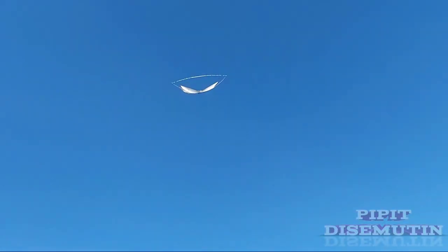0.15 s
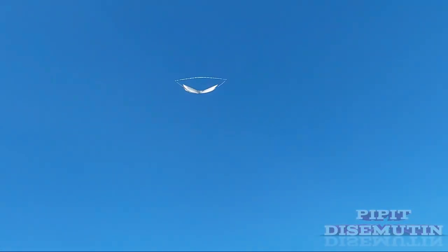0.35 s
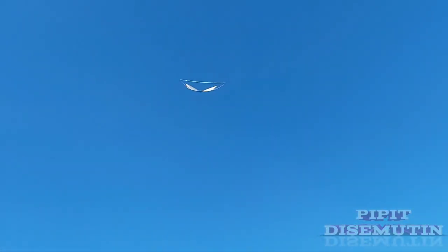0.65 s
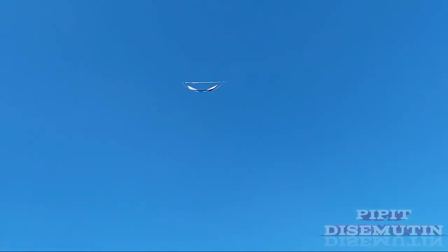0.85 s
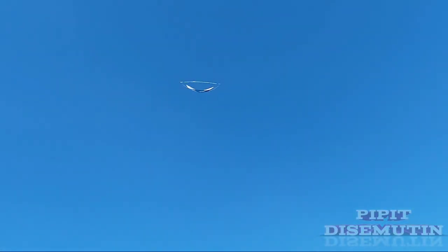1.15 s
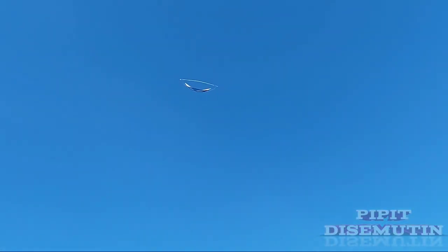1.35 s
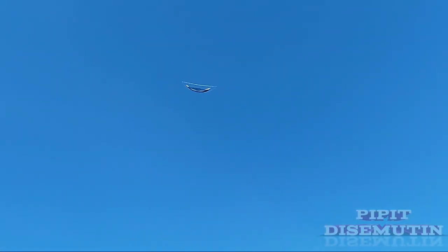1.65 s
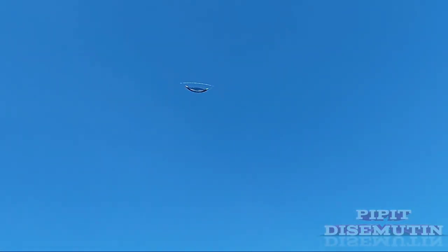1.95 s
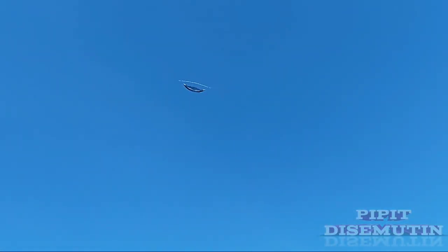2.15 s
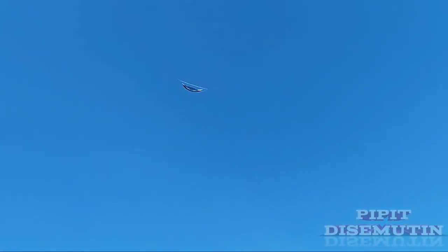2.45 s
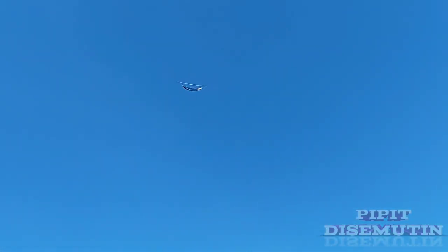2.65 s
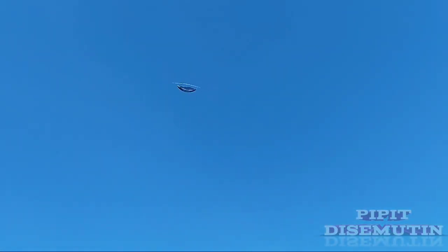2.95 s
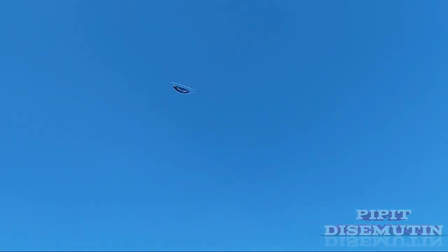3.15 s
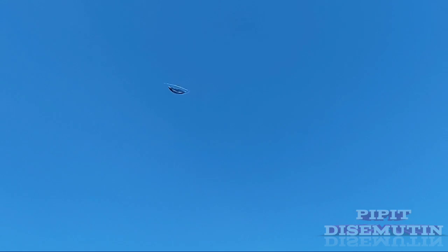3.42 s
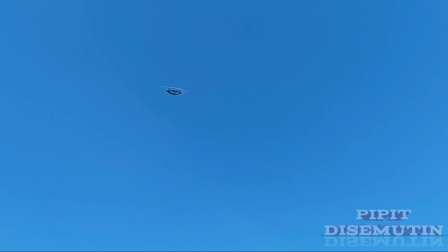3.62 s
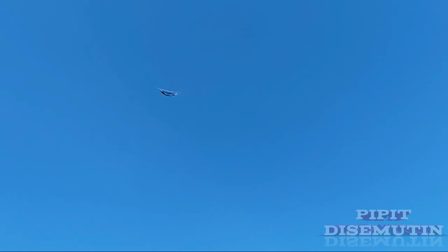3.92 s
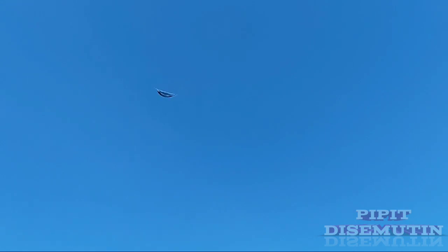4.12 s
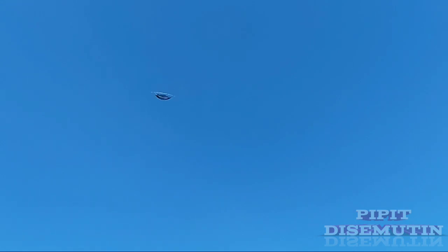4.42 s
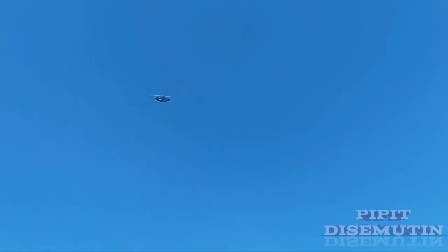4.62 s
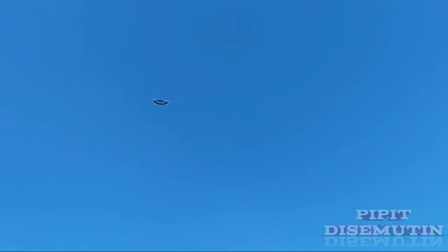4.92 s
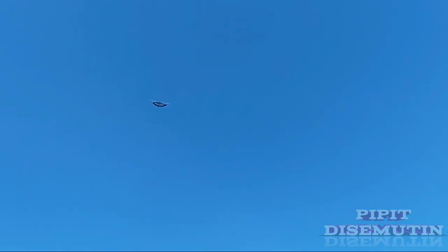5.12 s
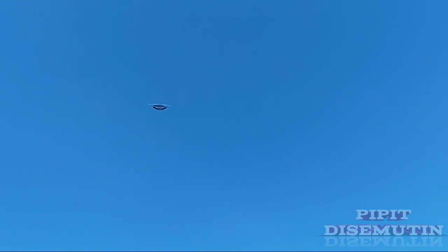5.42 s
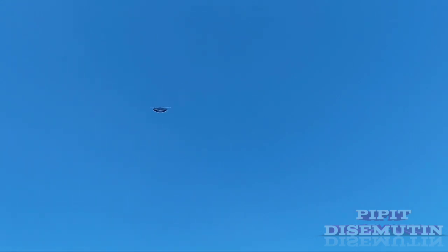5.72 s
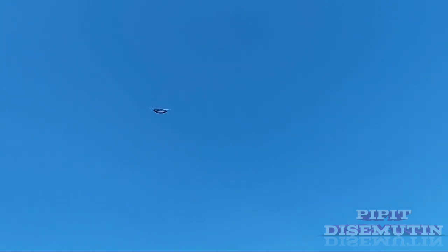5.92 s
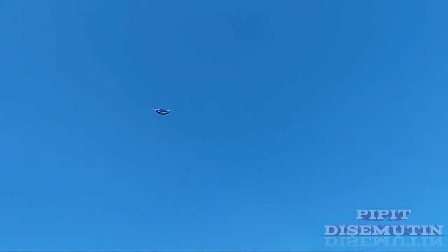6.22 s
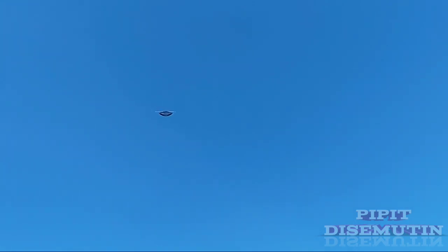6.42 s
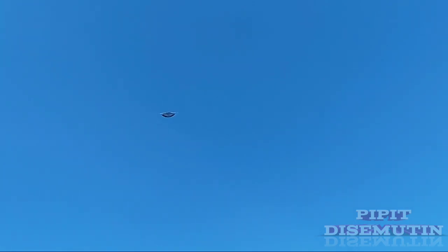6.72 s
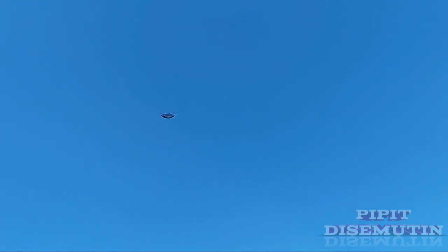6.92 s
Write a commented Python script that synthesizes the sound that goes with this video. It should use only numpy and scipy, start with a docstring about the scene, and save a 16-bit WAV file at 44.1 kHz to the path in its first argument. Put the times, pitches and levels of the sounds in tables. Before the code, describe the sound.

High overhead outdoors, a kite's stretched ribbon hums without pause, a fast fluttering whop-whop buzz of mid-pitched strokes with raspy, fizzing edges. Low wind rumble and dull thuds hit the microphone throughout, with a harsher gust on the right a little past the middle. A faint breeze rustles grass, tiny dry crackles appear, and a small bird ticks thinly towards the end.

```python
"""A taut ribbon on a kite drones high overhead: it twists to and fro about 15 times a second, and each
stroke is a short whoop of swept overtones and torn air that the ground repeats about 10 ms later.
Wind noise rumbles, roars and thuds at the two microphone ports; a breeze hisses and rustles in grass.
Shaped noise makes dry crackles, a papery scuff and, near three seconds, a faint raspy peep and a chirp.
A small bird, made of short rising whistles, ticks thinly towards the end."""
import sys
import numpy as np
from scipy import signal
from scipy.fft import rfft, irfft, next_fast_len
from scipy.io import wavfile
from scipy.ndimage import uniform_filter1d, map_coordinates

SR = 44100
rng = np.random.default_rng(int(sys.argv[2]) if len(sys.argv) > 2 else 0)


def inscribe(sig):
    """Save sig as 16-bit PCM at rate SR to the path in sys.argv[1].

    A 1-D sig is mono; a 2-D sig holds one channel per row.
    Samples are clipped to [-1, 1] before scaling.
    """
    pcm = np.round(np.clip(np.atleast_2d(sig).T, -1, 1) * 32767)
    wavfile.write(sys.argv[1], SR, pcm.astype(np.int16))


N = 311520

# how fast the ribbon twists to and fro: t/s, f/Hz (full swings)
SWING = [(0, 14.38), (.33, 14.5), (.62, 14.42), (1.45, 14.47), (1.65, 14.54), (2.3, 14.56), (2.5, 14.85),
         (2.65, 14.97), (2.95, 14.83), (3.25, 15.02), (3.55, 14.78), (4, 14.86), (5.2, 14.9), (5.9, 15.02),
         (6.35, 14.99), (6.52, 15.13), (6.8, 15), (7.06, 15.03)]
# air at the kite: t/s, turbulence (0-1), lean (0 = the backward stroke drags, 1 = the forward one)
AIR = [(0, .04, 0), (.6, .08, 0), (2.3, .04, 0), (2.7, .12, 0), (4, .2, 0), (4.3, .4, 0), (4.7, .4, .05),
       (5.2, .35, .4), (5.5, .12, .5), (5.9, .12, .75), (6.2, .06, 1), (7.06, .05, 1)]
# the whoop as the wind rises and falls: t/s, mean f/Hz before the stroke ratios, relative level/dB
RIBBON = [(0, 531.5, -11.5), (0.42, 572, -14.5), (0.85, 555, -13), (1.05, 575, -15.5), (1.5, 560.3, -12.5),
          (2.3, 536, -11), (2.5, 522, -15.5), (3.0, 514, -16), (3.6, 527.4, -15.5), (3.92, 525, -12),
          (4.17, 534, -15.5), (4.27, 502, -18), (4.45, 539, -17), (4.65, 517, -18.5), (4.75, 502, -15),
          (4.94, 594, -17), (5.12, 558, -16), (5.28, 568, -15.5), (5.4, 619, -14.5), (5.7, 584.6, -15.5),
          (6.15, 554.3, -14), (7.06, 535, -12)]
# how the strokes differ as the kite banks: t/s, backward pitch (ratio), backward extra level/dB,
# forward length (ratio)
BANK = [(0, 0.96, 2, 1.094), (1, 0.97, 0.5, 1.044), (2.35, 0.94, 0, 1.09), (2.6, 0.94, -0.5, 0.77),
        (3.2, 0.91, 1, 0.75), (4, 0.96, -1.5, 0.842), (5.5, 0.92, -2, 0.92), (7.06, 0.97, -2, 0.99)]
# course of a free and of a dragging stroke: t/ms from its middle, pitch (ratio), relative level/dB
FREE_STROKE = [(-8, 0.886, -17), (-11.5, 0.882, -14), (-7.5, 0.979, 4), (-2.5, 1.099, 3),
               (-1.5, 1.049, -5.5), (4, 0.857, -16), (13, 0.5865, -16), (21, 0.58, -16)]
DRAG_STROKE = [(-31, 0.59, -25), (-20.5, 0.594, -27.5), (-12, 0.818, -6.5), (-6, 0.937, -1),
               (-1, 1.045, 1.5), (0.5, 1.34, -0.5), (4, 0.855, -22.5), (10.5, 0.743, -23)]
# overtones of the whoop: multiple of the pitch, relative level/dB
OVERTONES = [(1, -4), (2, -19), (3, -31), (4, -43), (5, -45), (6, -50), (7, -47.5)]
# colours of the ribbon's dull rasp and of its fizz: f/Hz, relative level/dB per Hz
RASP_COLOUR = [(170, -80), (300, -3), (450, -2), (700, -2), (1100, -12.5), (1450, -12), (2200, -72),
               (4000, -72)]
FIZZ_COLOUR = [(600, 4.5), (1100, 3.5), (1800, 1), (2500, -23), (3100, -9.5), (4400, -15), (5300, -27),
               (7000, -20.5), (10000, -34), (15000, -46)]
# sizzle of the ribbon's edge: t/s, level/dB relative to the fizz pulses; its colour: f/Hz, level/dB per Hz
SIZZLE = [(0, -47), (3.2, -43), (3.8, -27.5), (4.5, -53), (5.1, -35), (5.6, -23.5), (6.5, -31), (7.06, -37)]
SIZZLE_COLOUR = [(1500, -42), (1950, 7), (2300, 0), (2900, -31), (4300, -7.5), (5500, -29.5)]
# the ground's echo follows the kite's height: t/s, delay/ms
GROUND = [(0, 9.38), (1, 9.92), (2, 9.99), (4.1, 9.88), (5.5, 9.67), (7.06, 9.49)]
# colours of the direct sound and of the echo at the microphone, which faces the ground: f/Hz, level/dB
DIRECT_COLOUR = [(1000, 0.5), (1500, -1.5), (2200, -2), (5000, 5.5)]
ECHO_COLOUR = [(300, 1), (600, 2), (1300, 0), (2200, 2.5), (3200, -1), (5000, -4.5), (10000, 4)]

# wind rumble on the two ports: t/s, left relative level/dB, right relative level/dB
WIND = [(0.0, -32, -27), (0.27, -26, -30.5), (0.36, -22, -20), (0.78, -17.5, -22.5), (1.35, -26, -42.5),
        (1.71, -17.5, -21.5), (2.01, -23, -31), (2.34, -19.5, -30), (2.58, -31, -45), (2.76, -25, -37),
        (3.24, -29.0, -47), (3.39, -12, -19), (3.51, -23.5, -38), (3.72, -22, -32.5), (4.2, -19.5, -38.0),
        (4.32, -30, -49), (4.41, -17.5, -29), (4.56, -16, -28), (4.65, -22, -43), (5.1, -16.5, -36),
        (5.43, -30, -54), (5.55, -19.5, -33), (5.73, -29, -34), (5.91, -16, -22.5), (6.12, -27, -39),
        (6.24, -20.5, -28), (6.51, -26.5, -43), (6.72, -23.5, -25), (6.81, -33, -25.5), (7.05, -16.5, -23)]
# the hollow roar of stronger gusts: t/s, relative level/dB
ROAR = [(0, -24), (.28, -25.5), (.45, -19.5), (.6, -17), (1, -21.5), (1.12, -25), (1.5, -20.5), (1.8, -20),
        (2.1, -25), (2.33, -20.5), (2.5, -26.5), (3.24, -21.5), (3.33, -18), (3.46, -19.5), (3.9, -24),
        (4.17, -17.5), (4.32, -27), (4.42, -15.5), (4.49, -20.5), (4.57, -14.5), (4.67, -34.5), (4.78, -16),
        (4.88, -25.5), (5.2, -18.5), (5.45, -30), (5.8, -26.5), (5.9, -19), (6.08, -29), (6.28, -20),
        (6.78, -34), (6.87, -18.5), (6.93, -28), (7.02, -17.5)]
# one long gust across the right port alone: t/s, relative level/dB
RUSH = [(3.7, -70), (4.08, -22.5), (4.17, -12.5), (4.28, -22), (4.43, -16.5), (4.65, -19.5), (4.73, -13.5),
        (4.82, -16.5), (4.9, -17), (5, -12.5), (5.1, -14.5), (5.22, -14), (5.32, -22), (5.4, -15.5),
        (5.6, -78)]
# the hardest slaps within that gust: t/s, length/s, level/dB
SLAPS = [(4.157, .016, -13), (4.193, .012, -10.5), (4.291, 0.0081, -15), (4.43, .012, -12),
         (4.693, .009, -10), (4.729, 0.011, -11), (4.77, .016, -11.5), (4.935, 0.0098, -9),
         (5.101, .012, -8.5), (5.207, 0.013, -10.5)]
# eddies that thud on the ports: t/s, length/s, relative level/dB, mean f/Hz, left over right level/dB
GUSTS = [(0.332, 0.011, -18.5, 120.0, -2), (0.465, 0.027, -20, 145.0, -11),
         (0.547, 0.018, -19.5, 100.0, -2), (0.616, 0.013, -13.5, 100.0, 0), (0.689, 0.032, -14.5, 117, 3),
         (0.766, 0.025, -16, 121, -3), (0.85, 0.03, -18.5, 119, -2), (1.009, 0.027, -13.5, 140.0, 2.0),
         (1.206, 0.015, -20, 114, -4), (1.69, 0.012, -17.5, 89.5, 0), (1.729, 0.0087, -18, 124, -1),
         (1.78, 0.018, -29, 100.0, -3), (1.837, 0.015, -17, 126, -2), (1.891, 0.019, -20, 105.0, 3.0),
         (2.333, 0.025, -16.5, 127, 5), (2.746, 0.016, -18, 115.0, 0), (3.348, 0.033, -13.0, 126, -1),
         (3.378, 0.015, -13, 95.0, 0), (3.911, 0.021, -23, 79, 5.0), (4.183, 0.016, -19, 89, 20),
         (4.4, 0.0089, -15, 141, 8), (4.527, 0.039, -22, 113, 12.0), (4.565, 0.015, -19, 109, 14.0),
         (5.001, 0.013, -19.0, 115.0, 24.0), (5.082, 0.017, -17.5, 96, 23.0),
         (5.211, 0.0093, -15, 126, 14.0), (5.29, 0.013, -17, 116, 27.0), (5.564, 0.012, -19.0, 95.0, 0),
         (6.674, 0.013, -14.5, 105.0, -2), (6.741, 0.017, -20.5, 75.0, -3),
         (6.858, 0.014, -18, 125.0, -2.0), (7.021, 0.021, -17.5, 102, 1)]
# colours of the rumble, the roar and the rush: f/Hz, relative level/dB per Hz
RUMBLE_COLOUR = [(15, -35), (30, -19), (50, -6), (75, -0.5), (110, -3), (160, -7.5), (230, -8.5),
                 (400, -11), (800, -29), (2000, -62), (6000, -79)]
ROAR_COLOUR = [(150, -43), (240, -11.5), (310, 1), (420, -2), (600, -11.5), (800, -14), (1300, -30.5),
               (2500, -54.5)]
RUSH_COLOUR = [(200, -33), (320, -2), (480, 2.5), (700, -1.5), (850, -9.5), (1200, -17), (1600, -26.5),
               (2400, -33), (5000, -55)]
# breeze in the grass: t/s, relative hiss level/dB
BREEZE = [(0.0, -58), (0.57, -55), (1.08, -58), (2.18, -54), (2.54, -57.5), (2.77, -62), (3.91, -53),
          (4.27, -59), (5.68, -55), (6.11, -55), (6.55, -52), (7.06, -52.5)]
# brief hissing swishes close by: t/s, length/s, level/dB
SWISHES = [(0.674, 0.025, -58), (4.676, 0.028, -52), (4.793, 0.025, -52), (5.39, .05, -53),
           (5.755, 0.025, -55), (6.555, 0.021, -48)]
# colours of the grass's rustle and hiss: f/Hz, relative level/dB per Hz
RUSTLE_COLOUR = [(200, -33), (330, -1), (600, -6.5), (1100, 10), (1600, -3), (2400, 3), (3100, -5.5),
                 (4500, -6), (5400, -15), (7000, -11.5), (10000, -44)]
HISS_COLOUR = [(2000, -35), (5000, -13), (7000, -5.5), (9000, 0.5), (12000, -2), (14000, -6.5),
               (15500, -40)]

# the bird's ticks: t/s, peak level/dB, middle f/Hz
CHIPS = [(4.6553, -45, 6880), (5.1243, -43, 7000), (5.2919, -44, 7600), (5.46, -38, 7320),
         (5.624, -34, 7250), (5.793, -33, 6800), (5.9934, -29, 7070), (6.205, -30, 7070),
         (6.3777, -29.5, 7040), (6.569, -30.5, 6990), (6.7775, -47, 6860)]
# one faint peep: t/s, length/s, relative level/dB
PEEP = (2.912, .04, -39)
# small dry crackles, and at 3.208 s a short chirp rendered as noise: t/s, relative level/dB
CRACKLES = [(0.5442, -27), (0.5764, -19), (0.6445, -24), (1.2256, -27), (1.718, -25), (1.8946, -32),
            (2.13, -24), (2.1634, -32), (3.208, -22.5), (3.409, -22), (3.4424, -23), (3.453, -26),
            (3.487, -24), (4.489, -25)]
# colours of the peep, the crackles with the chirp, and the papery scuff: f/Hz, relative level/dB per Hz
PEEP_COLOUR = [(2000, -40), (2700, -5), (3100, 1), (3400, -6), (3800, -35), (6000, -71)]
CRACKLE_COLOUR = [(1000, -8), (4000, 18), (8000, -1), (15000, -23), (18000, -60)]
SCUFF_COLOUR = [(900, -20), (1500, 0), (1900, -1), (2600, -13), (5000, -26), (12000, -33)]

FIRST_SWING = -0.44  # place in the swing at the start (swings)
BACK_SHARE = .476  # the backward stroke comes this share of a swing after the forward one
# a stroke's middle over the mean pitch (ratio); its level and a dragging one's extra (dB)
PITCH_RATIO, STROKE_DB, DRAG_DB = 1.02, 3.5, 2.5
# a dragging stroke is flatter (share of the pitch) and keeps more level when the wind drops (dB per dB)
DRAG_FLAT, DRAG_HOLDS = 0.085, 0.17
# overtone tilt: gain as the ribbon is driven harder (dB per dB) and loss when it drags (dB);
# both are multiplied by the square root of the overtone's place in its table, from 0
BRIGHTENS, DRAG_DULL_DB = 0.23, 6.5
DRAG_FIZZ_DB, FIZZ_SCATTER_DB = -2.5, 1.5  # fizz change when dragging; random spread between strokes
PATCH_DB = 3.5  # how deeply the colour of the fizz varies
# share of a stroke that is torn air: always, more when it drags, more in eddies
SMOOTH_TEAR, DRAG_TEAR, EDDY_TEAR = .14, .26, 1
# at full lean the backward stroke's pitch slides from SAG above to SAG below (share) and it lasts
# longer by LINGER (share); the slide's time scale, and its delay after the stroke's peak (ms)
SAG, LINGER, SAG_MS, SAG_LATE_MS = .25, .2, 7, 2.5
FLUTTER_DB, LUMP_DB = 1.2, 2.4  # unevenness of the wind: slow flutter and quick lumps
TOP_HZ = 15500  # the recorder's band limit


def amp(db):
    """Turn decibels into gain."""
    return 10 ** (np.asarray(db) / 20)


def unit(x):
    """Scale to an rms of 1."""
    return x / np.sqrt(np.mean(x ** 2) + 1e-20)


def read(rows, at=None):
    """Read each later column of a table at the given places, by default at every sample."""
    places, *columns = np.transpose(rows)
    at = np.arange(N) / SR if at is None else at
    return [np.interp(at, places, column) for column in columns]


def wobble(rate):
    """Draw a smooth random curve with so many knots a second."""
    knots = rng.standard_normal(int(N * rate / SR) + 4)
    return map_coordinates(knots, [np.arange(N) * rate / SR])


def filtered(x, response):
    """Change the strength and phase of each frequency by a response."""
    m = next_fast_len(N + 8192)
    return irfft(rfft(x, m) * response(np.fft.rfftfreq(m, 1 / SR)), m)[..., :N]


def noise(colour, channels=2):
    """Make unrelated coloured noises with an overall rms of 1."""
    f, db = np.transpose(colour)
    white = rng.standard_normal((channels, N))
    return unit(filtered(white, lambda hz: amp(np.interp(np.log(hz + 1), np.log(f), db))))


def place(times, grains):
    """Add up short sounds, one per row, that begin at the given times."""
    index = np.round(np.asarray(times) * SR).astype(int)[:, None] + np.arange(grains.shape[1])
    inside = (index >= 0) & (index < N)
    return np.bincount(index[inside], grains[inside], N)


def swells(times, lengths, levels_db):
    """Make an envelope of smooth bumps, each with its middle, length and height, added as power."""
    t = np.arange(N) / SR
    rows = zip(times, lengths, levels_db)
    return np.sqrt(sum(amp(2 * db) * np.exp(-2 * ((t - s) / length) ** 2) for s, length, db in rows))


def hummer(tone_db=3.0, rasp_db=-9, fizz_db=-25, buzz_db=-0.45):
    """Forward and backward ribbon whoops, each with a rasp, a fizz and a sizzle of torn air."""
    both_ways = np.hstack([strokes(backward=False), strokes(backward=True)])
    tone, tearing, fizzing = whoops(both_ways)
    rasp = tearing * noise(RASP_COLOUR, channels=1)[0]
    fizz = amp(fizz_db) * noise(FIZZ_COLOUR, channels=1)[0]
    buzz = fizzing * amp(buzz_db) * patchy(fizz + sizzle())
    return amp(tone_db) * tone + amp(rasp_db) * rasp + buzz


def strokes(backward):
    """Time, pitch, level, drag, turbulence, length and sag of the ribbon's strokes in one direction."""
    swings = FIRST_SWING + np.cumsum(read(SWING)[0]) / SR
    wanted = np.arange(backward * (BACK_SHARE - 1), swings[-1], 1)
    times = np.interp(wanted, swings, np.arange(N) / SR)
    pitch_hz, effort_db = read(RIBBON, times)
    turbulence, lean = np.clip(read(AIR, times), 0, 1)
    back_ratio, back_db, forward_length = read(BANK, times)
    drag = 1 - lean if backward else lean
    pitch_hz = PITCH_RATIO * pitch_hz * (1 - DRAG_FLAT * (drag - .5)) * back_ratio ** (backward - .5)
    lull_db = effort_db.mean() - effort_db
    level_db = effort_db + (drag - .5) * (DRAG_DB + DRAG_HOLDS * lull_db) + backward * back_db
    length = 1 + LINGER * lean if backward else forward_length
    return np.array([times, pitch_hz, level_db, drag, turbulence, length, backward * lean * SAG])


def whoops(columns, scatter_db=2.5, detune=0.084, slip=2.4, waver=0.16, stagger=0.0059, full_db=-15):
    """The strokes' tone, and envelopes of torn air and of a fizz that pulses with every shed vortex."""
    times, pitch_hz, level_db, drag, turbulence, length, sag = columns[:, :, None]
    half = SR // 36
    ms = np.arange(-half, half) * 1000 / SR
    peak_ms = FREE_STROKE[2][0]
    own_ms = peak_ms + (ms - peak_ms) / length
    # the ribbon's inertia rounds every corner of a stroke
    courses = np.array([read(FREE_STROKE, own_ms), read(DRAG_STROKE, own_ms)])
    (free_ratio, free_db), (drag_ratio, drag_db) = uniform_filter1d(courses, size=130)

    # eddies upset each stroke's size, pitch, phase, timing and course
    size, tune, shift, late = turbulence * rng.standard_normal((len(times), 4)).T[:, :, None]
    eddies = signal.resample(rng.standard_normal((len(times), 16)), len(ms), axis=1)
    hz = pitch_hz * (free_ratio + drag * (drag_ratio - free_ratio))
    hz = hz * (1 + detune * tune + waver * turbulence * eddies)
    hz = hz * (1 - sag * np.tanh((ms - peak_ms - SAG_LATE_MS) / SAG_MS))
    phase = 2 * np.pi * np.cumsum(hz, axis=1) / SR

    # in steady air the vortices keep step with the swing at the height of each stroke
    course = amp(free_db + drag * (drag_db - free_db)) * signal.windows.tukey(len(ms), .1)
    mean_phase = np.average(phase, axis=1, weights=course ** 4, keepdims=True)
    phase = phase - mean_phase + slip * shift
    swell = amp(STROKE_DB + level_db + scatter_db * size) * course
    tilt_db = BRIGHTENS * (level_db - full_db) - DRAG_DULL_DB * drag
    tone = sum(amp(db + np.sqrt(k) * tilt_db) * np.sin((k + 1) * phase)
               for k, (_, db) in enumerate(OVERTONES))

    # a dragging stroke stalls and tears more air than a free one
    tearing = swell * (SMOOTH_TEAR + DRAG_TEAR * drag + EDDY_TEAR * turbulence)
    fizz_db = DRAG_FIZZ_DB * drag + FIZZ_SCATTER_DB * rng.standard_normal(times.shape)
    fizzing = swell * amp(fizz_db) * unit((1 + np.cos(phase)) ** 2)
    starts = (times - half / SR + stagger * turbulence * late)[:, 0]
    return place(starts, swell * tone), place(starts, tearing), place(starts, fizzing)


def patchy(x):
    """Let the colour of a noise drift at random, in smooth patches of time and frequency."""
    z = signal.stft(x, nperseg=512)[2]
    across_pitch = uniform_filter1d(rng.standard_normal(z.shape), size=5, axis=0)
    patches = uniform_filter1d(across_pitch, size=4, axis=1)
    return signal.istft(z * amp(PATCH_DB * unit(patches)), nperseg=512)[1][:N]


def sizzle():
    """The bright, narrow noise of the ribbon's edge, rising and falling on its own curve."""
    return amp(read(SIZZLE)[0]) * noise(SIZZLE_COLOUR, channels=1)[0]


def outdoors(x, lead_ms=0.069, left_echo=1.154, right_echo=0.51, skew_ms=0.16, scatter_db=-13,
             t60=0.68, right_db=2.0, echo_fade=0.22):
    """Sound from above arrives directly, once off the ground, and faintly scattered from things around."""
    def left_first(hz, ms):
        """Phase turns that bring the left port ahead of the right."""
        return np.exp(np.outer([1, -1], 1j * np.pi * hz * ms / 1000))

    delay_ms, = read(GROUND)
    strength = 1 - echo_fade * read(AIR)[0]  # the echo is weaker where the turbulence value is higher
    late = map_coordinates(x, [np.arange(N) - delay_ms * SR / 1000], order=3)
    # the echo comes from below: it reaches the ports in another order, and the left one more strongly
    echo = strength * filtered(late, lambda hz: left_first(hz, -skew_ms) * amp(read(ECHO_COLOUR, hz)[0]))
    direct = filtered(x, lambda hz: amp(read(DIRECT_COLOUR, hz)[0]))
    both = direct + np.array([[left_echo], [right_echo]]) * echo
    ports = filtered(both, lambda hz: left_first(hz, lead_ms))
    t = np.arange(SR // 3) / SR
    tail = rng.standard_normal((2, len(t))) * amp(-60 * t / t60)
    tail /= np.linalg.norm(tail, axis=1, keepdims=True)
    scattered = signal.fftconvolve(x[None], tail, axes=1)[:, :N]
    left, right = ports + amp(scatter_db) * scattered
    return np.array([left, amp(right_db) * right])


def buffeting(rumble_db=-1, roar_left_db=-3, roar_right_db=0, rush_db=-2):
    """Unrelated wind noises at the two ports: rumble, hollow roar, a brighter rush on the right, thuds."""
    def eddying(colour):
        """Lumpy noise, different on each side."""
        lumps = np.array([wobble(45), wobble(45)])
        return unit(amp(LUMP_DB * lumps) * noise(colour))

    rumble_level = amp(np.array(read(WIND)) + rumble_db + FLUTTER_DB * wobble(13))
    rumble = rumble_level * eddying(RUMBLE_COLOUR)
    roar_level = amp(read(ROAR)[0] + np.array([[roar_left_db], [roar_right_db]]))
    roar = roar_level * eddying(ROAR_COLOUR)
    rush_level = np.hypot(amp(read(RUSH)[0] + rush_db), swells(*np.transpose(SLAPS)))
    rush = np.array([[0], [1]]) * rush_level * eddying(RUSH_COLOUR)
    return rumble + roar + rush + thuds()


def thuds(level_db=0, wander=0.3, port_lag=1.04):
    """Each eddy pushes on the ports for a few uneven cycles, not quite in step on the two sides."""
    s, length, db, pitch_hz, pan_db = np.transpose(GUSTS)[:, :, None]
    t = np.arange(-SR // 12, SR // 12) / SR
    drift = signal.resample(rng.standard_normal((2, len(s), 20)), len(t), axis=2)
    phase = 2 * np.pi * np.cumsum(pitch_hz * (1 + wander * drift), axis=2) / SR
    # the middle of each thud gets a random phase, partly shared by the ports
    middle = rng.uniform(0, 2 * np.pi, s.shape) + port_lag * rng.standard_normal((2, len(s), 1))
    phase += middle - phase[:, :, len(t) // 2, None]
    push = 2 * amp(db + level_db) * .5 ** (2 * (t / length) ** 2) * np.sin(phase)
    starts = s[:, 0] + t[0]
    return np.array([place(starts, port / np.hypot(1, amp(side * pan_db)))
                     for port, side in zip(push, (-1, 1))])


def grass(rustle_db=14, rustle_grows=0.86, hiss_db=-0.5, flicker_db=2.5, shared=0.92):
    """One breeze drives a soft rustle all around and a fine hiss, with a few swishes close by."""
    breeze_db, = read(BREEZE)
    mean_db = breeze_db.mean()
    rustle_level_db = mean_db + rustle_grows * (breeze_db - mean_db) + rustle_db
    blades = unit(noise(RUSTLE_COLOUR) + shared * noise(RUSTLE_COLOUR, channels=1))
    rustle = amp(rustle_level_db + flicker_db * wobble(40)) * blades
    hiss_level = np.hypot(amp(breeze_db + hiss_db), swells(*np.transpose(SWISHES)))
    return rustle + hiss_level * noise(HISS_COLOUR)


def bird(length=0.0064, sweep=0.33, left_db=0, right_db=0):
    """Each tick is a whistle that shoots upward within a few milliseconds."""
    s, peak_db, pitch_hz = np.transpose(CHIPS)
    u = np.arange(int(length * SR)) / (length * SR)  # 0 to 1 through the tick
    phase = 2 * np.pi * np.cumsum(pitch_hz[:, None] * (1 + sweep * (u - .5)), axis=1) / SR
    ticks = amp(peak_db)[:, None] * np.sin(np.pi * u) ** 2 * np.sin(phase)
    return amp([[left_db], [right_db]]) * place(s, ticks)


def peep():
    """One soft, raspy peep of noise off to the side, largely opposite in phase at the two ports."""
    opposed = np.array([[.6], [-.8]]) * noise(PEEP_COLOUR, channels=1)
    rasp = opposed + .55 * noise(PEEP_COLOUR)
    return swells(*np.transpose([PEEP])) * rasp


def crackles(level_db=-11):
    """Tiny, soft snaps and one short chirp, all as noise that starts in about 1 ms and dies away fast."""
    s, peak_db = np.transpose(CRACKLES)
    t = np.arange(SR // 30) / SR
    envelope = amp(-60 * t / .035) * (1 - np.exp(-t / .001))
    return place(s, amp(peak_db[:, None] + level_db) * envelope) * noise(CRACKLE_COLOUR)


def scuff(level_db=-32):
    """One brief papery rustle close by: a smooth bump of noise."""
    envelope = np.exp(-.5 * ((np.arange(N) / SR - .885) / .017) ** 2)
    return amp(level_db) * envelope * noise(SCUFF_COLOUR, channels=1)


def scene():
    """The hummer overhead, with wind and small sounds near the ground."""
    return outdoors(hummer()) + buffeting() + grass() + bird() + peep() + crackles() + scuff()


def record(dry):
    """The recorder clips at full scale, then keeps nothing above its band limit."""
    return filtered(np.clip(dry, -1, 1), lambda hz: hz < TOP_HZ)


dry = scene()
out = record(dry)
inscribe(out)
```